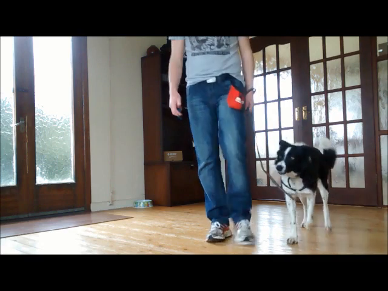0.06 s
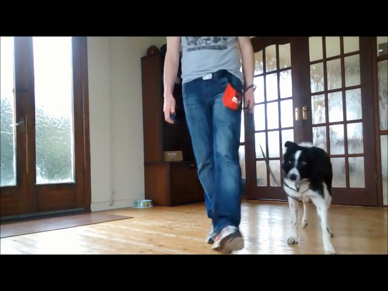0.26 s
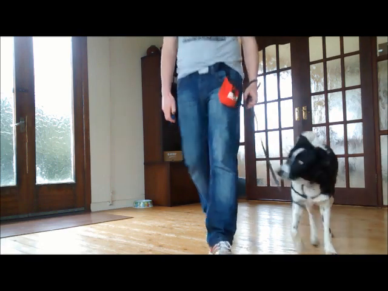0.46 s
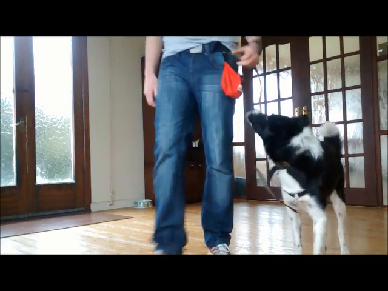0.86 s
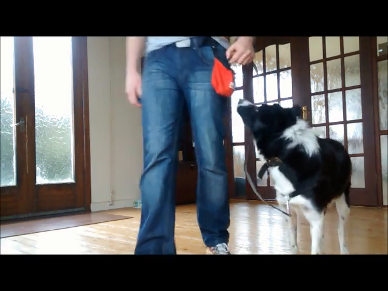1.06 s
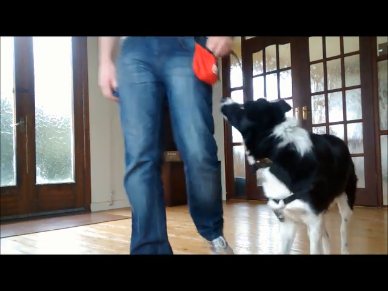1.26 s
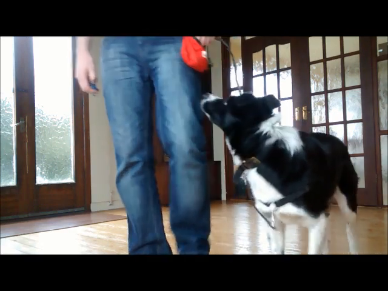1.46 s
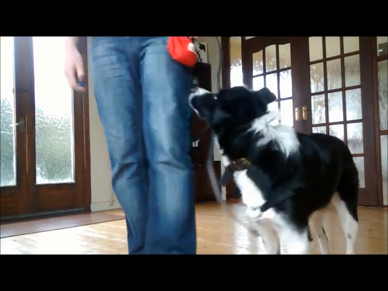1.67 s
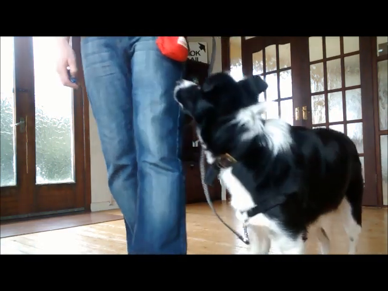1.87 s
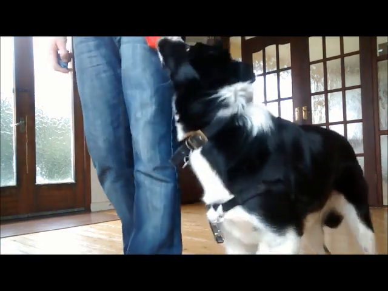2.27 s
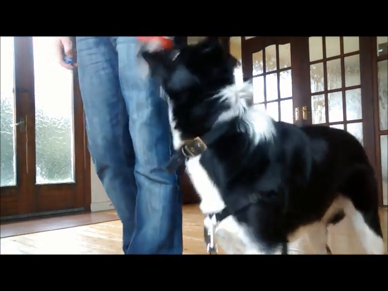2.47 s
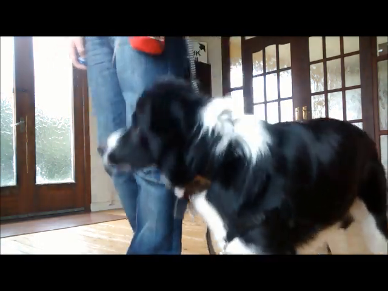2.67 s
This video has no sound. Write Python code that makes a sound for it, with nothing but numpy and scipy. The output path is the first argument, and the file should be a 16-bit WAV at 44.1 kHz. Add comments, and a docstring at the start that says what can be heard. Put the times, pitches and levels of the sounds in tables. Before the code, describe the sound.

Footsteps and dog paws on a wooden floor, with a brief leash clink early on.

```python
"""Footsteps cross a wooden floor as a person walks a dog on a leash through a bare room.
Soles scuff, boards knock and the sprung floor booms, each impact exciting damped resonances.
Early on, the leash jerks, and its clip and the harness ring clink twice in their inharmonic modes.
Claws and small fittings tick, cloth and paws rustle softly, and the room reverberates throughout."""
import sys
import numpy as np
from scipy import signal
from scipy.fft import rfft, irfft
from scipy.io import wavfile

SR = 44100
rng = np.random.default_rng(int(sys.argv[2]) if len(sys.argv) > 2 else 0)


def pcm_store(signal):
    """Save signal as 16-bit PCM."""
    levels = np.round(np.clip(np.atleast_2d(signal), -1, 1) * 32767)
    wavfile.write(sys.argv[1], SR, levels.astype(np.int16).T)


N = 119070
HZ = np.fft.rfftfreq(4096, 1 / SR)  # frequency grid of the filters


def amp(db):
    """Amplitude ratio: a factor of ten for every 20 dB."""
    return np.exp(np.asarray(db) * np.log(10) / 20)


def unit(x):
    """Normalisation to an rms of 1."""
    return x / np.sqrt(np.mean(x ** 2) + 1e-20)


def read(points, hz):
    """Interpolation on a logarithmic frequency axis."""
    f, value = np.transpose(points)
    return np.interp(np.log(hz + 1), np.log(f), value)


def add(mix, s, sound):
    """Superposition: a sound joins the mix at time s."""
    part = mix[max(round(s * SR), 0):][:len(sound)]
    part += sound[:len(part)]


def causal(db):
    """Minimum-phase impulse response of a gain curve given on HZ."""
    log_gain = np.log(amp(np.r_[db, db[-2:0:-1]]))
    return np.fft.ifft(np.exp(np.conj(signal.hilbert(log_gain)))).real


def shaped(x, points):
    """Linear filtering: the spectrum is multiplied by a gain curve."""
    return irfft(rfft(x) * amp(read(points, np.fft.rfftfreq(N, 1 / SR))), N)


def pair(spectra, hz):
    """Partial coherence: the sound at two nearby points is most alike around 600-1200 Hz."""
    # likeness of left and right (frequency [Hz], correlation [-])
    correlation = [(50, 0.13), (250, 0.021), (600, 1), (1200, 0.93), (2000, -0.35), (15000, 0.23)]
    same = np.clip(read(correlation, hz), -1, 1)
    return np.array([spectra[0], same * spectra[0] + np.sqrt(1 - same ** 2) * spectra[1]])


def struck(modes, rise_s, pitch=1, rattle_rad=0):
    """Free vibration: a sum of damped modes, whose phases wander if the body rattles."""
    t = np.arange(SR // 2) / SR
    rattle_hz = 96
    out = np.zeros(len(t))
    for f, db, t60 in modes:
        wander = np.interp(t * rattle_hz, np.arange(200), rng.standard_normal(200))
        out += amp(db - 60 * t / t60) * np.sin(2 * np.pi * f * pitch * t + rattle_rad * wander)
    return (1 - np.exp(-t / rise_s)) * out


def footfalls(rows, modes, rise_s):
    """Impact excitation: each footfall rings the wood at the pitch of the place where it lands."""
    out = np.zeros(N)
    for s, db, hz in rows:
        add(out, s, amp(db) * struck(modes, rise_s, hz))
    return out


def contacts(rows, colour, ripple_db=0):
    """Source and filter: dying clusters of tiny impacts, coloured by the resonance of the spot touched."""
    peak_db, peak_octaves = 9.5, 0.21
    grain_db, rise_share, ripple_hz = 3.5, 0.21, 109.4
    out, t = np.zeros(N), np.arange(SR // 4) / SR
    treble = np.clip(np.log2(HZ / 1500 + 1e-6) / 2, 0, 1)
    for s, length, db, centre_hz, bright_db in rows:
        grains = rng.choice([-1., 1.], len(t))
        grains *= amp(grain_db * np.minimum(rng.exponential(1, len(t)), 4))
        grains *= rng.random(len(t)) < .12
        grains *= np.exp(-t / length) * (1 - np.exp(-t / (rise_share * length)))
        peak = np.exp(-.5 * (np.log2((HZ + 1) / centre_hz) / peak_octaves) ** 2)
        ripple = np.interp(HZ / ripple_hz, np.arange(len(HZ)), rng.standard_normal(len(HZ)))
        ripple *= ripple_db * (1 + treble) / 2  # many weak resonances
        response = causal(read(colour, HZ) + peak_db * peak + bright_db * treble + ripple)
        sound = signal.fftconvolve(grains, response)
        add(out, s, 10 * amp(db) * sound / np.linalg.norm(sound))
    return out


def air():
    """Stationary noise: a steady room rumble under a faint hiss."""
    # background spectrum (frequency [Hz], level [dB])
    spectrum = [(20, -7), (45, -5), (80, -9), (170, -18), (260, -15.5), (600, -20.5), (1200, -21.5),
                (2400, -28), (3800, -27), (6000, -30.5), (10000, -33.5), (15500, -34)]
    noise = pair(rfft(rng.standard_normal((2, N))), np.fft.rfftfreq(N, 1 / SR))
    return amp(-52.5) * unit(shaped(irfft(noise, N), spectrum))


def rustle():
    """Shot noise: cloth and paw pads touch at random instants, slowly fading."""
    # spectrum of a soft touch (frequency [Hz], level [dB])
    spectrum = [(40, -31), (160, -17.5), (260, -1.5), (500, 6.5), (1100, -9), (2400, -12), (3800, -7.5),
                (7000, -35), (15000, -47)]
    touches_per_s, grain_db, fall_db_per_s = 260, 2, 2.5
    touches = rng.standard_normal(N) * amp(grain_db * np.minimum(rng.exponential(1, N), 3))
    touches *= rng.random(N) < touches_per_s / SR
    return amp(-57 - fall_db_per_s * np.arange(N) / SR) * unit(shaped(touches, spectrum))


def board_knocks():
    """Strong damping: the modes of a struck board die quickly, leaving a hollow knock."""
    # impacts on the boards (time [s], level [dB], pitch [Hz])
    knocks = [(.002, -43, 255.5), (.38, -43.5, 327), (.428, -32.5, 281.6), (.503, -29, 374.4),
              (.555, -31, 240.6), (.60, -52, 271), (.670, -36, 1056), (.743, -29, 412), (.829, -42, 326),
              (1.275, -42, 371.5), (1.826, -48, 125), (2.068, -33, 452), (2.086, -31.5, 534.5),
              (2.15, -43.5, 122), (2.165, -47.5, 368), (2.273, -29.5, 257.2), (2.2735, -38, 520),
              (2.55, -51, 125)]
    # board modes (ratio to pitch [-], level [dB], T60 [s])
    board_modes = [(1.002, 0.5, 0.09), (1.171, -9, 0.085), (1.552, -5, 0.044), (2.2, -18.5, 0.031)]
    return footfalls(knocks, board_modes, rise_s=0.0026)


def sole_scuffs():
    """Friction and impact noise: soles scuff and slap the boards."""
    # sole contacts (time [s], decay time [s], level [dB], resonance [Hz], treble gain [dB])
    scuffs = [(.035, 0.065, -40.5, 574, -26), (.198, 0.026, -32, 1750, 5), (.485, 0.095, -33.5, 423, -6),
              (.668, 0.0077, -30, 1100, -19), (.827, 0.002, -29.5, 1660, 3), (.845, 0.011, -35, 1040, 4.5),
              (1.02, 0.09, -41.5, 543, -13), (1.215, 0.0052, -42.5, 920, -22),
              (1.275, 0.004, -42, 464, -30), (1.40, 0.065, -42.5, 540, -1), (1.596, 0.0063, -39, 875, -1.5),
              (1.605, 0.0077, -39, 1940, -3.5), (1.823, 0.015, -42, 684, -4), (1.945, 0.025, -43.5, 810, 7),
              (2.095, 0.03, -33.5, 574, -10.5), (2.2725, 0.022, -38, 477, -35),
              (2.44, .010, -38.5, 1400, -4)]
    # spectrum of a sole on wood (frequency [Hz], level [dB])
    spectrum = [(40, -25), (170, -10), (330, -2.5), (700, -0.5), (1600, -8), (2500, -13.5), (4000, -9.5),
                (6500, -20.5), (10000, -29.5), (15500, -39)]
    return contacts(scuffs, spectrum, ripple_db=5)


def leash_clinks():
    """Modal ringing: the loose ring and clip chatter as they sound; the damped latch only snaps."""
    # harness ring modes (frequency [Hz], level [dB], T60 [s])
    ring_modes = [(2206, -3, 0.13), (2350, -12, 0.16), (2793, -7, 0.12), (3837, -17, 0.33),
                  (4010, -4, 0.17), (4320, -6, 0.16), (4306, 1.5, .19), (4528, -18, 0.28),
                  (6220, -10.5, .14), (7150, -16.5, 0.17), (7860, -19, .12), (11400, -30, 0.077)]
    # leash clip modes (frequency [Hz], level [dB], T60 [s])
    clip_modes = [(1552, -11.5, 0.54), (1600, -1, 0.091), (1724, 1, 0.25), (2205, -8, .1),
                  (3115, -21, 0.22), (3345, -2, 0.14), (3408, -1.5, 0.35), (3458, -2.5, 0.23),
                  (4000, -5.5, 0.11), (4180, -5, 0.19), (4500, -18, 0.15), (5210, -10, 0.15),
                  (7110, -13, 0.21), (8900, -25, .14)]
    latch_modes = [(2060, 6, 0.0094), (2570, -6.5, 0.012)]
    # metal strikes (time [s], level [dB], part [name])
    strikes = [(.290, -21, 'latch'), (.2925, -36, 'ring'), (0.2987, -24.5, 'ring'), (0.349, -42, 'ring'),
               (.429, -15.5, 'latch'), (0.4418, -27, 'clip')]
    modes = {"ring": ring_modes, "clip": clip_modes, "latch": latch_modes}
    out = np.zeros(N)
    for s, db, part in strikes:
        add(out, s, amp(db) * struck(modes[part], rise_s=0.00047, rattle_rad=1))
    return out


def clip_clatter():
    # clacks (time [s], decay time [s], level [dB], resonance [Hz], treble gain [dB])
    clacks = [(.290, 0.0032, -29.5, 2130, -9), (.2975, 0.0049, -27.5, 2700, 4),
              (.4332, 0.0037, -21, 1940, -5.5), (.440, 0.0045, -26, 1850, -1.5),
              (.483, 0.0089, -34, 1660, 1)]
    spectrum = [(40, -24), (200, -21), (700, -11.5), (1400, -9), (2500, -6.5), (4500, -2), (6500, -9.5),
                (10000, -17.5), (15500, -25)]
    return contacts(clacks, spectrum)


def floor_thuds():
    """Mass-spring resonance: the sprung floor booms as weight comes down on it."""
    # landings (time [s], level [dB], pitch [Hz])
    thuds = [(.435, -31.5, 48.7), (.485, -30, 63.6), (.585, -31.5, 53.7), (.744, -26, 52.8),
             (.826, -29, 57.8), (1.0, -38, 51.4), (1.06, -41.5, 71.7), (1.165, -35, 51), (1.265, -33, 47.6),
             (1.365, -37, 46), (1.45, -36.5, 50), (1.59, -34.5, 44.5), (1.765, -36.5, 46.3),
             (1.83, -42, 60), (1.99, -35, 45.3), (2.055, -33, 60.4), (2.155, -27.5, 46.3),
             (2.24, -33.5, 48), (2.405, -32, 44), (2.53, -35.5, 59.2)]
    # floor modes (ratio to pitch [-], level [dB], T60 [s])
    floor_modes = [(1, -1.5, 0.21), (1.45, -10, 0.18), (2.3, -14, 0.15)]
    return footfalls(thuds, floor_modes, rise_s=0.0075)


def claw_ticks():
    """Brief contact gives a broad spectrum: claws and small fittings tick."""
    # ticks (time [s], decay time [s], level [dB], resonance [Hz], treble gain [dB])
    ticks = [(.660, .006, -34, 5240, -5.5), (.829, 0.00091, -45, 3940, 9), (.962, 0.0016, -53, 6000, 14),
             (1.215, 0.0028, -47, 3520, 2), (1.449, 0.0023, -51.5, 8350, 6),
             (1.509, 0.0017, -41.5, 960, -11), (1.548, 0.0089, -52, 3470, -14),
             (1.921, .012, -40.5, 4240, -12.5), (1.943, 0.0025, -39, 4000, -7.5),
             (2.077, 0.012, -40.5, 8950, 7), (2.085, 0.0099, -37, 3870, 11),
             (2.319, 0.0049, -42.5, 3670, -6), (2.418, 0.0032, -33, 1870, 0),
             (2.423, 0.011, -39.5, 3650, -5), (2.675, 0.0086, -51, 4030, 38)]
    # spectrum of a tick (frequency [Hz], level [dB])
    spectrum = [(200, -10.5), (700, -4), (1600, 0), (2500, -5.5), (4000, -4), (6500, -7.5), (10000, -20),
                (15500, -26)]
    return contacts(ticks, spectrum)


def in_room(x, room_db):
    """Reverberation: direct sound from the right, then a diffuse tail that dies faster in the treble."""
    # reverberation time (frequency [Hz], T60 [s])
    room_t60 = [(100, 0.78), (300, 0.48), (700, .44), (1700, 0.51), (4500, 0.5), (8000, 0.37),
                (15000, 0.17)]
    onset_s, left_lag_samples = 0.0016, 12
    t = np.arange(SR) / SR
    echoes = rng.standard_normal((2, SR)) * (rng.random((2, SR)) < .04 + 4 * t)
    hz, frame_s, spectra = signal.stft(echoes, SR, nperseg=256)
    spectra = pair(spectra, hz[:, None]) * amp(-60 * frame_s / read(room_t60, hz)[:, None])
    tail = signal.istft(spectra, SR, nperseg=256)[1][:, :SR] * (1 - np.exp(-t / onset_s))
    tail /= np.sqrt(np.minimum(0.051 + 4 * t, 1))  # echoes grow denser without gaining power
    tail /= np.linalg.norm(tail, axis=1, keepdims=True)
    left = np.r_[np.zeros(left_lag_samples), x[:-left_lag_samples]]
    return np.array([left, x]) + amp(room_db) * signal.fftconvolve(x[None], tail, axes=1)[:, :N]


def scene():
    """Superposition: all sources sum in the room, with unlike colours at left and right."""
    # stereo balance (frequency [Hz], level left minus right [dB])
    balance = [(60, -0.5), (250, 1.5), (500, 1.5), (1100, 0.5), (2200, -3), (4200, -6), (5800, -5),
               (8000, 4.5), (12000, 9.5), (15500, 3)]
    touches = clip_clatter() + claw_ticks() + sole_scuffs() + rustle()
    mix = in_room(touches, room_db=2.5)
    mix += in_room(leash_clinks(), room_db=-4)
    mix += in_room(board_knocks(), room_db=0)
    mix += in_room(floor_thuds(), room_db=-8)
    lean_db = read(balance, HZ) / 2
    sides = np.array([causal(lean_db), causal(-lean_db)])
    return signal.fftconvolve(mix, sides, axes=1)[:, :N] + air()


def record(dry):
    """Band limiting: a linear-phase low-pass removes the highest treble."""
    cutoff_hz = 15580
    lowpass = signal.firwin(511, cutoff_hz, window=("kaiser", 9), fs=SR)
    return signal.oaconvolve(dry, lowpass[None], "same")


dry = scene()
out = record(dry)
pcm_store(out)
```